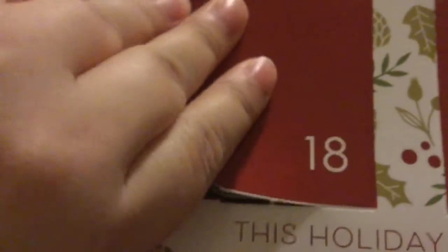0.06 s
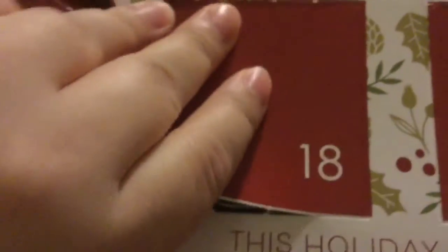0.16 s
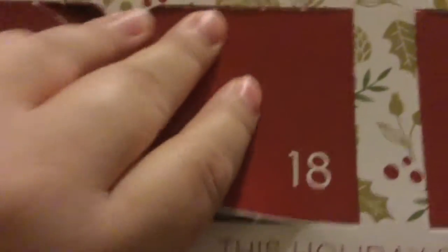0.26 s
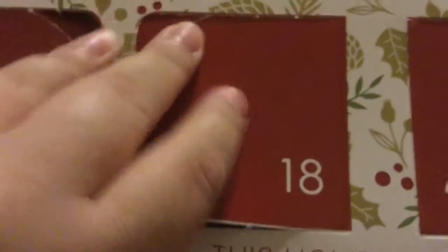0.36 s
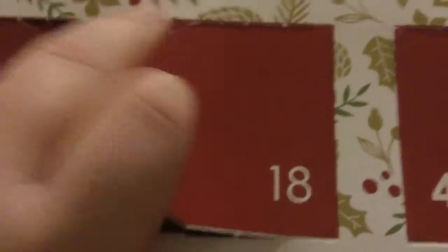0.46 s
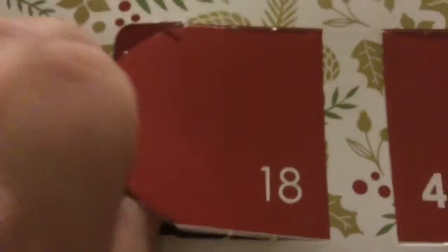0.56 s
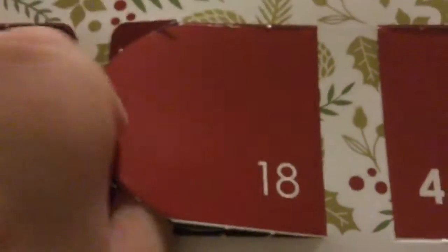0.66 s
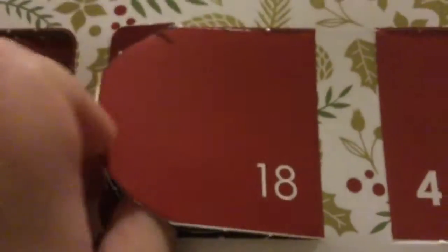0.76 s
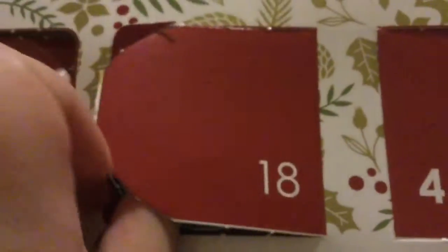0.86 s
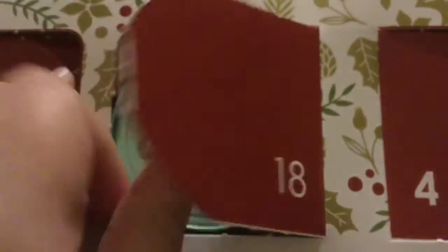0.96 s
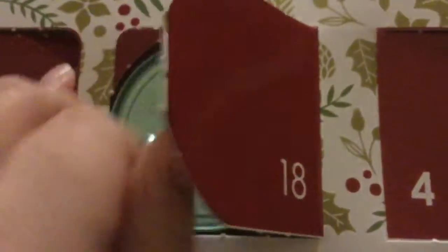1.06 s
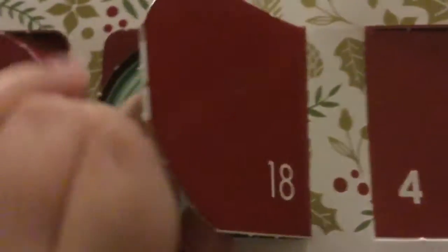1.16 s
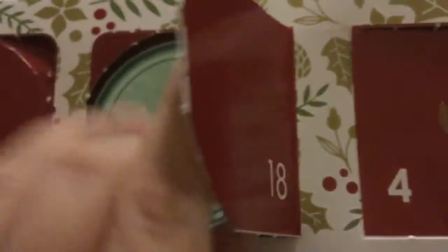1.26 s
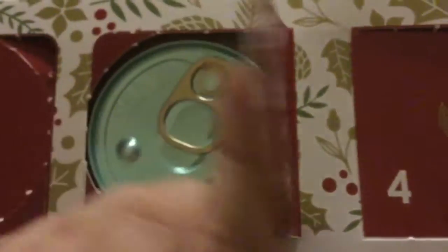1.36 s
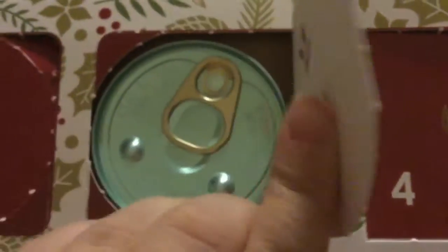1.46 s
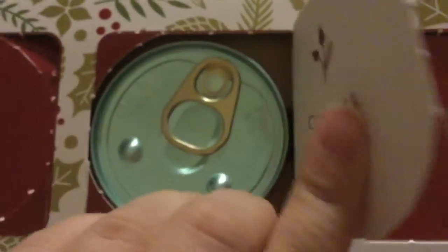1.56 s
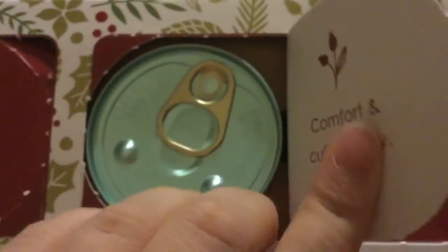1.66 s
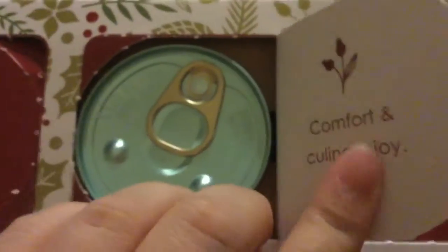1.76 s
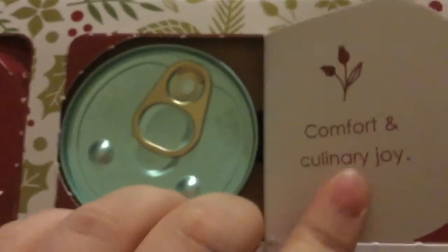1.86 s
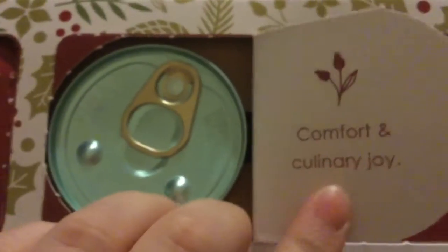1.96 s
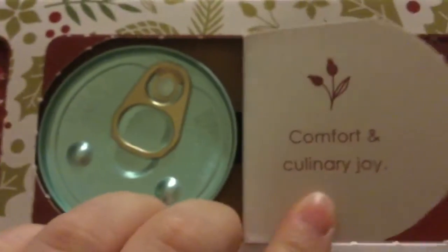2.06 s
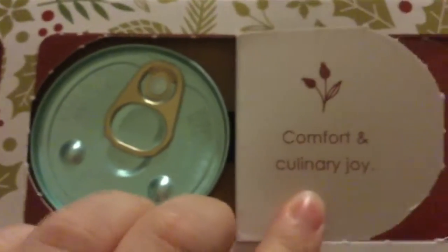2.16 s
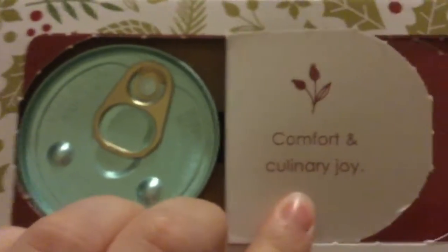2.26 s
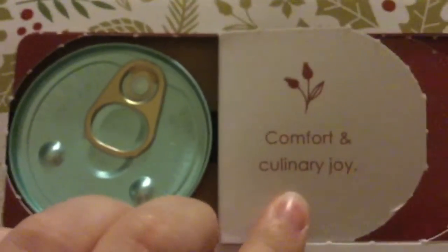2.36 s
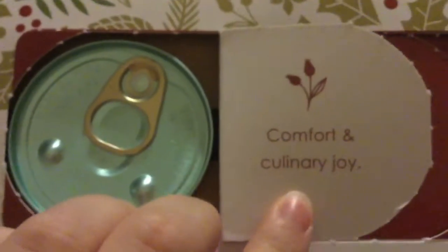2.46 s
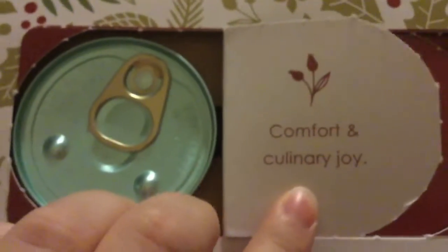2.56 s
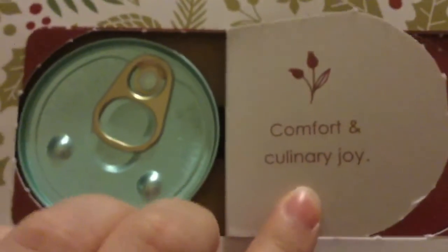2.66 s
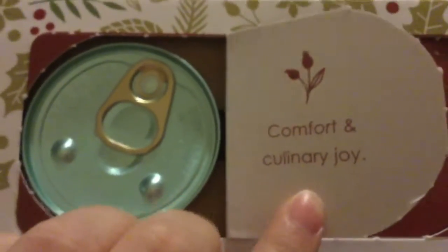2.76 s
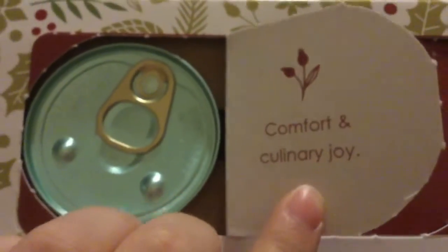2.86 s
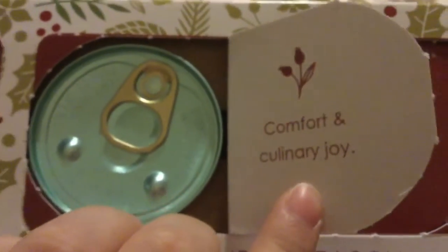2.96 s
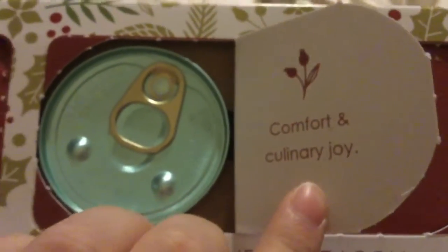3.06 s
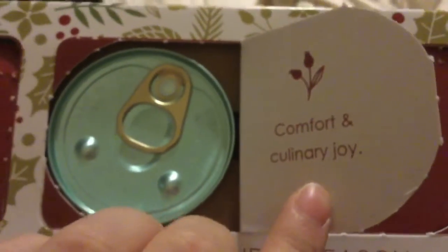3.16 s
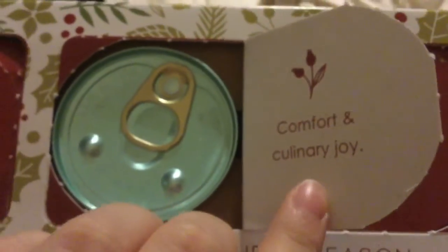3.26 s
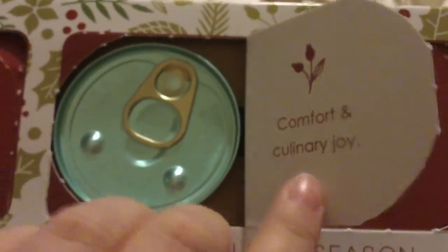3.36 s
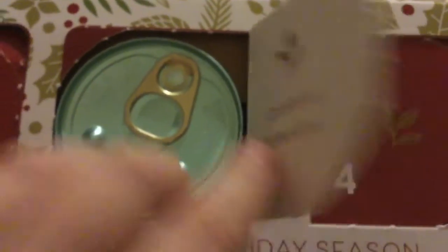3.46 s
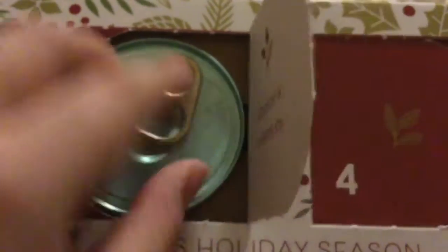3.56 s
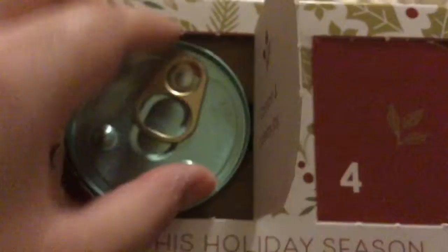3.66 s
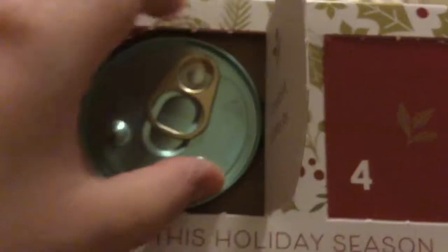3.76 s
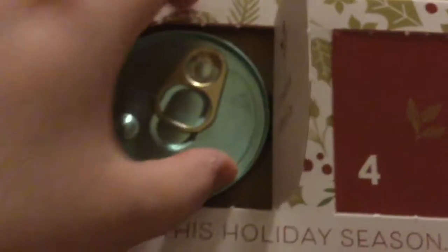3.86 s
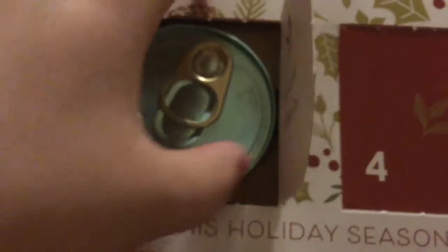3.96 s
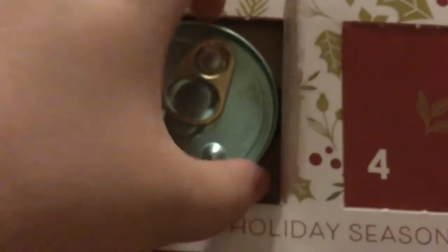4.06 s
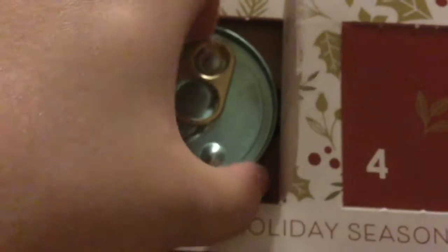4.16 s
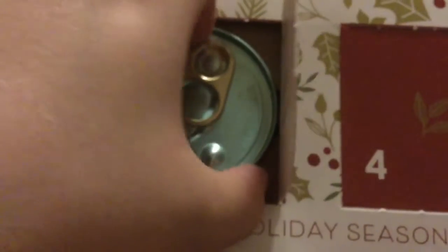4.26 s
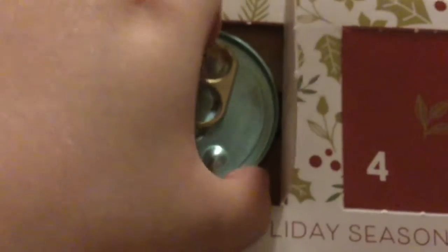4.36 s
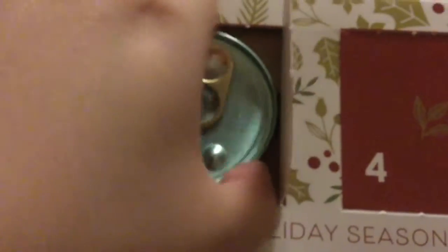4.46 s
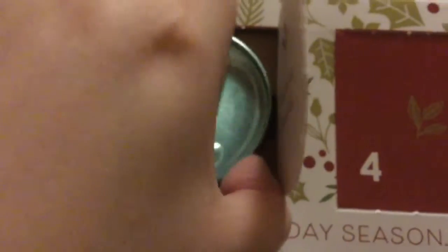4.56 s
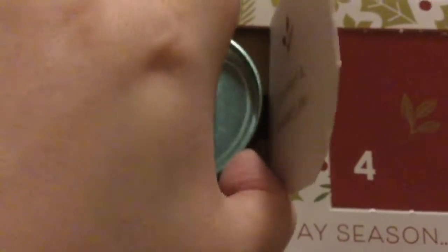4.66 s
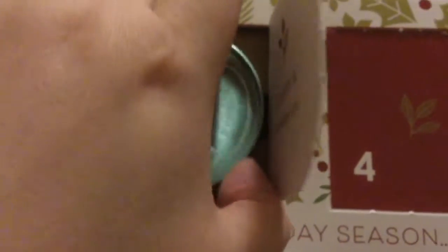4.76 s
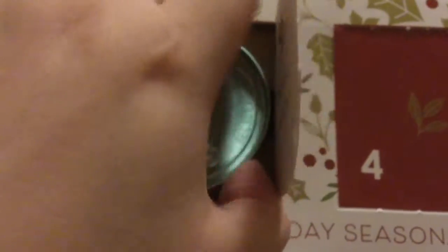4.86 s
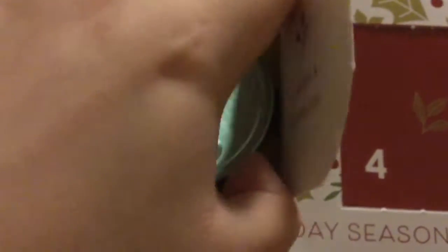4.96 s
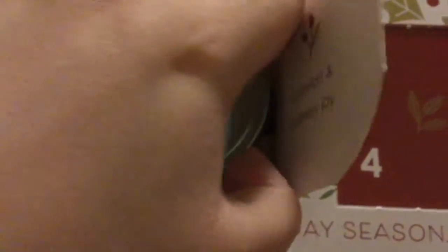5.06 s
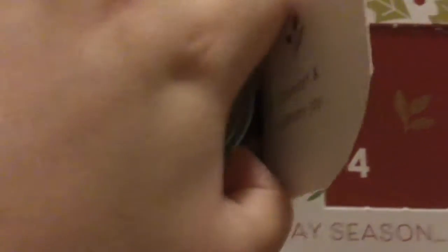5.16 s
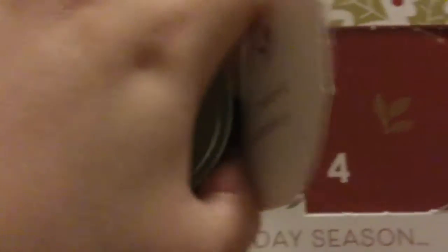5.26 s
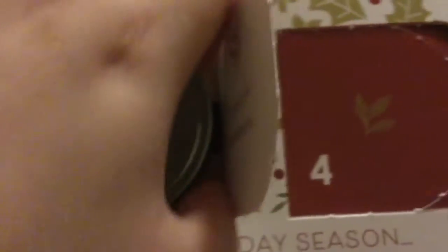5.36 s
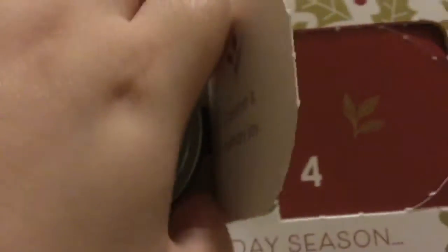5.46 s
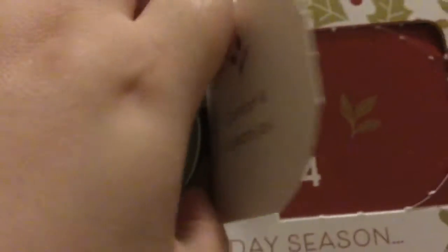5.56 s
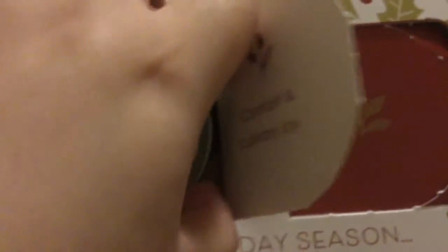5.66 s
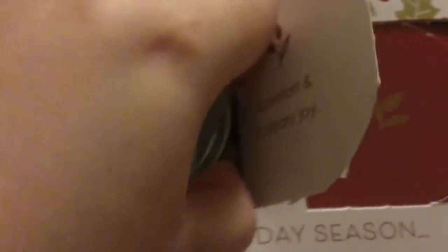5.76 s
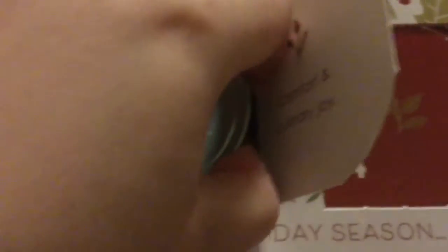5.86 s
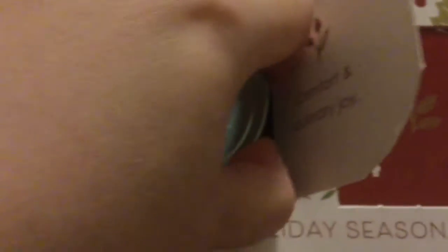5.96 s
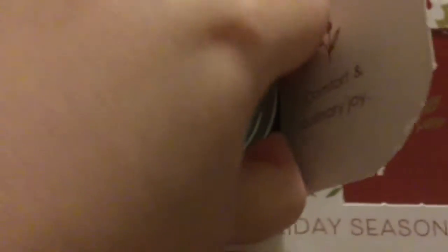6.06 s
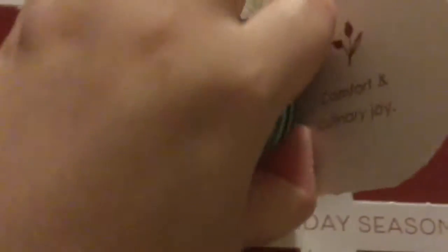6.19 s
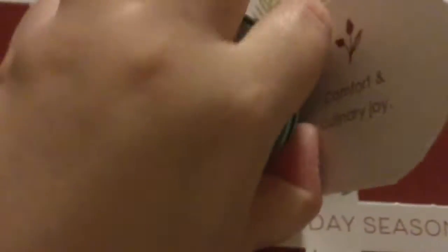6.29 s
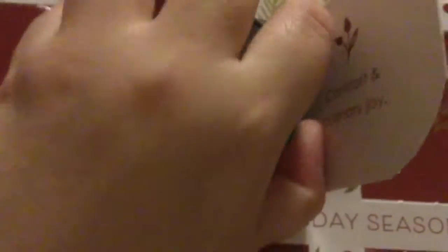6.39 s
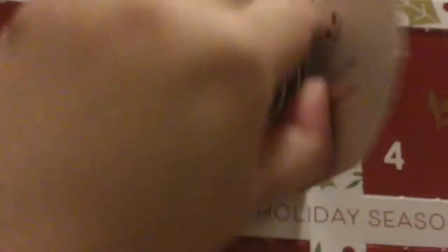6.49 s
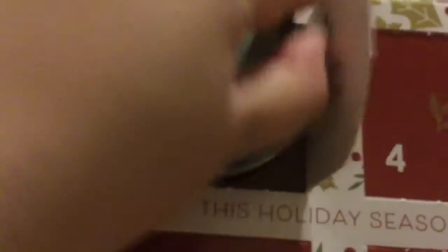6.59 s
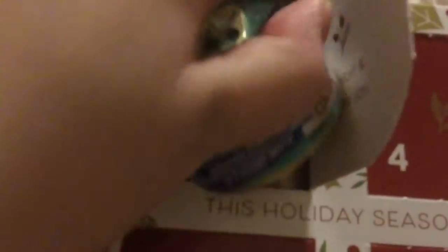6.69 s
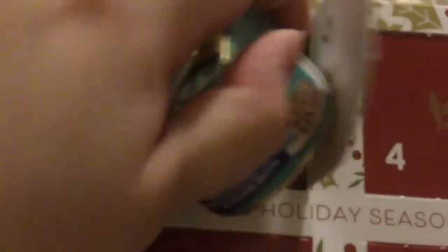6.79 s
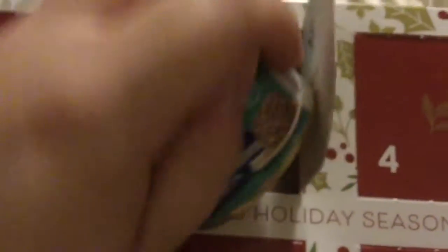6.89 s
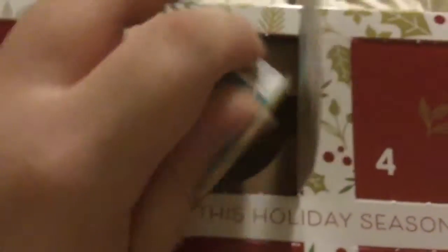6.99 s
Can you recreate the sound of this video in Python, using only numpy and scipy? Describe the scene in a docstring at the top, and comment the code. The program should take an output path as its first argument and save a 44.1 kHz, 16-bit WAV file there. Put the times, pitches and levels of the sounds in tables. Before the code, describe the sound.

Very close in a small dry room, fingers break the paper bridges of a cardboard door: crisp snaps, card flexing and hollow box thuds amid grainy scraping. The folded door settles into near silence with faint taps. Then a hand rubs into the pocket, a tin knocks with a short ring, creaks and scrapes build, a loud pop frees it, and its rim chatters lightly as it slides out. The small microphone sounds thin in the bass.

```python
"""Fingers pop a perforated door out of a cardboard box, fold it back and pry a small tin from its pocket.
First the paper bridges snap, the card flexes and the hollow box thuds: noise bursts, short pings, box ringing.
Between snaps skin and tin scrape on the card: grainy noise coloured by the card. Light taps are short crunches.
Last, the tin knocks in its pocket and chatters as it slides out: ticks and a ringing rim.
A small dry room adds sparse echoes and very faint air; the one microphone is small and easily overloaded."""
import sys
import numpy as np
from scipy import signal
from scipy.fft import rfft, irfft, next_fast_len
from scipy.io import wavfile
from scipy.ndimage import uniform_filter1d

SR = 44100
rng = np.random.default_rng(int(sys.argv[2]) if len(sys.argv) > 2 else 0)


def file_out(sig):
    """Save sig as 16-bit WAV at sys.argv[1]."""
    # one column per channel
    cols = np.atleast_2d(sig).T
    # limit, then scale
    lim = np.clip(cols, -1, 1)
    pcm = np.round(lim * 32767).astype(np.int16)
    wavfile.write(sys.argv[1], SR, pcm)


N = 310023
TIME = np.arange(N) / SR
BLOW_TIME = np.arange(SR // 5) / SR  # the time within one short sound [s]

# ringing of the hollow box: (frequency [Hz], relative level [dB], time to fall by 60 dB [s])
BOX_MODES = [(172, -13, 0.12), (230, -1, 0.08), (287, 2.5, 0.078), (340, 0, 0.048), (397.6, -6, 0.085),
             (637.5, -8, 0.08), (783, -6, 0.036), (980, -11.5, 0.045)]
# the hand bears on the box, tearing, holding the door open, prying: (start [s], length [s], rasp level [dB])
HAND_GRIPS = [(0.027, 1.51, -56), (1.544, 0.12, -61), (3.442, 0.14, -64.5), (3.683, 0.85, -59.5),
              (4.458, 0.44, -54), (4.981, 0.96, -52.5), (6.333, 0.25, -65.5), (6.508, 0.83, -52.5)]
FIRM_DB = -43.5  # a firm touch: a rub this loud judders fully, lighter ones run smoother
EDGE_HZ = 16200  # top of the hiss and of the microphone's range


def amp(db):
    """Turns decibels into gain."""
    return 10 ** (np.asarray(db) / 20)


def unit(x):
    """Scales a sound to rms 1."""
    return x / np.sqrt(np.mean(x ** 2) + 1e-20)


def blow(x, db):
    """Scales a short sound to the energy of 10 ms at the level db."""
    return amp(db) * x / np.sqrt(np.sum(x ** 2) / (SR / 100) + 1e-20)


def read(points, hz):
    """Reads a table of (frequency, value) along log frequency."""
    f, value = np.transpose(points)
    return np.interp(np.log(hz + 1), np.log(f), value)


def add(mix, s, sound):
    """Mixes a sound in at time s."""
    part = mix[max(round(s * SR), 0):][:len(sound)]
    part += sound[:len(part)]


def band(x, lo_hz, hi_hz, order=2):
    """Keeps the sound between two frequencies."""
    edges = [lo_hz, min(hi_hz, 0.49 * SR)]
    return signal.sosfilt(signal.butter(order, edges, "band", fs=SR, output="sos"), x)


def resonate(x, hz, q):
    """Passes a sound through one resonance with gain 1 at its peak."""
    return signal.lfilter(*signal.iirpeak(hz, q, SR), x)


def waver(rate_hz):
    """Makes a smooth random curve of rms 1 that changes up to about rate_hz times a second."""
    smoothing = 1 + (np.fft.rfftfreq(N, 1 / SR) / rate_hz) ** 4
    return unit(irfft(rfft(rng.standard_normal(N)) / smoothing, N))


def snaps(strain_s=0.0028, strain_db=-30, last_db=-17.5):
    """Breaks and buckles of the card: a first strain, the snap itself, then the last fibres."""
    # bridges breaking and card buckling: (time [s], box thud level [dB], card flex level [dB],
    # crack level [dB], flex pitch [Hz], crack pitch [Hz])
    breaks = [(0.1188, -17, -11.5, -17.5, 890, 3950), (0.244, -21, -17.5, -15, 810, 5160),
              (0.55, -17, -15, -18.5, 706, 4020), (0.6256, -21.5, -28.5, -42.5, 1240, 7000),
              (0.6607, -19.5, -20, -19.5, 1700, 2880), (0.6854, -12, -15, -13.5, 1003, 2630),
              (0.7965, -34, -25.5, -21.5, 970, 3700), (1.0066, -22.5, -28, -37.5, 710, 8300),
              (1.0205, -17.5, -10, -14, 643, 2610), (1.0327, -26, -42, -17.5, 2420, 3774),
              (1.4129, -25, -28, -39, 1530, 4800), (1.5118, -28.5, -30, -35, 1754, 3460),
              (2.2012, -37.5, -42.5, -39, 1007, 3494), (3.6806, -28.5, -34.5, -41.5, 669, 4290),
              (3.8837, -36.5, -37, -39.5, 606, 4160), (4.1818, -26, -32, -35, 2350, 4090),
              (4.243, -33.5, -37.5, -33, 1540, 5220), (4.2966, -39, -37, -37, 1570, 3280),
              (4.782, -21, -25, -28, 520, 4100), (5.0338, -33, -37, -39.5, 1720, 3900),
              (5.3358, -32, -34, -30.5, 2160, 2170), (5.689, -26, -19, -22.5, 1636, 4550),
              (5.7951, -33, -27, -31, 629, 3510), (6.245, -13.5, -12, -18, 1510, 4240),
              (6.26, -19.5, -28, -26.5, 747, 2925), (6.8622, -29.5, -32.5, -30, 778, 2615)]
    out = np.zeros(N)
    for s, thud_db, flex_db, crack_db, flex_hz, crack_hz in breaks:
        last_s = rng.uniform(0.003, 0.018)
        for delay, db in [(-strain_s, strain_db), (0, 0), (last_s, last_db)]:
            add(out, s + delay, snap(thud_db + db, flex_db + db, crack_db + db, flex_hz, crack_hz))
    return out


def snap(thud_db, flex_db, crack_db, flex_hz, crack_hz, crack_s=0.0012, flex_s=0.0043, thud_rise_s=0.0025):
    """Fibres break at once, the card around them flaps for a few ms, then the box takes up the blow."""
    t = BLOW_TIME
    fibres, flap = rng.standard_normal((2, len(t)))
    fibres = np.sign(fibres) * (np.exp(-t / crack_s) + 0.052 * np.exp(-t / 0.011))
    ping = np.sin(2 * np.pi * crack_hz * t) * np.exp(-t / 0.0016)  # the freed edge rings for a few cycles
    crack = blow(band(fibres, crack_hz * 0.4, crack_hz * 2.51), 0) + blow(ping, 0)
    crack += blow(np.diff(fibres, prepend=0), -12)  # a bright edge

    flap = flap * (np.exp(-t / flex_s) + 0.15 * np.exp(-t / 0.018))
    bending = np.sin(2 * np.pi * flex_hz * t) * np.exp(-t / 0.0032)
    flex = blow(band(flap, 370, 1750), 0) + blow(bending, 0)

    thud = box_ring(t) * (1 - np.exp(-t / thud_rise_s))
    return blow(crack, crack_db) + blow(flex, flex_db) + blow(thud, thud_db)


def box_ring(t):
    """The box rings in several modes; each blow lands on another spot, so they take different shares."""
    ring = np.zeros(len(t))
    for hz, db, t60 in BOX_MODES:
        fade = amp(db + 2 * rng.standard_normal() - 60 * t / t60)
        sign = rng.choice([-1, 1])
        shifted_hz = hz * (1 + 0.012 * rng.standard_normal())
        ring += fade * sign * np.sin(2 * np.pi * shifted_hz * t)
    return ring


def creaks(rub, per_s=28, thud_db=1, flex_db=-1, crack_db=-3, spread_db=7):
    """While the hand grips, the card keeps giving way in tiny snaps, as loud as the rub allows."""
    out = np.zeros(N)
    for when, a, b, c, flex, crack in rng.random((round(per_s * N / SR), 6)):
        s = when * N / SR
        if any(start < s < start + length for start, length, _ in HAND_GRIPS):
            levels = np.array([thud_db, flex_db, crack_db]) + spread_db * (2 * np.array([a, b, c]) - 1)
            tiny_snap = snap(*levels, 600 * 2.7 ** flex, 2400 * 2 ** crack)
            add(out, s, rub[int(when * N)] * tiny_snap)
    return out


def bend(x, lag_s=0.001196):
    """Low bending waves in card are slower: a snap sweeps downward, lag_s late at 1 kHz, on time from 4 kHz."""
    size = next_fast_len(N + SR // 4)
    khz = np.fft.rfftfreq(size, 1 / SR) / 1000
    turns = 1000 * lag_s * (4 * np.sqrt(khz) - khz)  # phase lag in whole cycles
    turns = np.where(khz < 4, turns, turns.max())
    return irfft(rfft(x, size) * np.exp(-2j * np.pi * turns), size)[:N]


def rubbing(grip_rumble_db=0, grip_hiss_db=-12.5):
    """Gains of rasp, rumble and hiss over time: all slides and the dull grips add in power."""
    # slides of a finger, the door or the tin along the card: picking at the bridges, tearing the door free,
    # folding it back, reaching into the pocket, working the tin loose, sliding it out. Soft pressure rumbles,
    # a torn edge hisses: (start [s], length [s], rasp level [dB],
    # rumble level relative to rasp [dB], hiss level relative to rasp [dB])
    slides = [(0.344, 0.068, -44, -25, -2), (0.444, 0.05, -36, 0.5, -9.5), (0.52, 0.32, -47.5, 1, -2.5),
              (0.986, 0.17, -43.5, -28, -2.5), (1.192, 0.048, -39.5, 4.5, 0.5), (1.244, 0.27, -46, -17, 1),
              (1.637, 0.45, -54, -1, -2.5), (2.105, 0.19, -56, 3, -20.5), (3.509, 0.051, -41.5, -23, -4),
              (3.677, 0.038, -40.5, 8.5, -3.5), (3.752, 0.025, -40, -7, -6), (4.087, 0.17, -45, 0, -7),
              (4.473, 0.27, -46.5, -9, -10), (4.732, 0.16, -41.5, 0, -3.5), (5.085, 0.05, -46, -25, 2),
              (5.268, 0.1, -44, 2.5, -2), (5.403, 0.15, -44.5, -13, -5), (5.563, 0.16, -43, -22, -13.5),
              (5.782, 0.12, -45.5, -27, -0.5), (6.015, 0.31, -49, -2.5, -11.5),
              (6.177, 0.1, -40, -24, -4.5), (6.533, 0.064, -37.5, -6.5, -6), (6.601, 0.074, -41, -18, -1.5),
              (6.66, 0.032, -32.5, 5, 0.5), (6.725, 0.068, -46, -10, -7)]
    grips = [(*grip, grip_rumble_db, grip_hiss_db) for grip in HAND_GRIPS]
    power = np.zeros((3, N))
    for start, length, db, rumble_db, hiss_db in list(slides) + grips:
        gains = amp([[db], [db + rumble_db], [db + hiss_db]])
        power += gains ** 2 * pressure(start, length) ** 2
    return np.sqrt(power)


def pressure(start, length, attack_s=0.018, sag_db=3.5, release_db_per_s=546):
    """A slide or grip bites, eases as it runs, then dies away."""
    t = TIME - start
    fall_db = sag_db * np.clip(t / length, 0, 1) + release_db_per_s * np.clip(t - length, 0, 1)
    return np.clip(t / attack_s, 0, 1) * amp(-fall_db)


def scrape(rub, soft, sharp, hollow=2):
    """Rubbing rasps in the card, rumbles in the modes of the box and hisses at the torn edges."""
    drive = friction(np.minimum(rub / amp(FIRM_DB), 1))
    hollow_sound = sum(amp(db) * resonate(drive, hz, hz * t60 / 2) for hz, db, t60 in BOX_MODES)
    boxed = drive + hollow * hollow_sound
    rasp = unit(band(drive, 350, 5200, order=4))
    rumble = unit(band(boxed, 110, 540, order=4))
    hiss = unit(band(drive, 5510, EDGE_HZ, order=4))
    return rub * rasp + soft * rumble + sharp * hiss


def friction(firm, grains_per_s=1400, spread_db=4, smooth=1.3, judder_db=3.0, patchy_db=5.5):
    """Fibres catch and let go in clumps; the card's resonances shift as the contact point moves."""
    # colour of rubbed card: (frequency [Hz], level [dB])
    card_colour = [(80, -28), (200, -7.5), (285, -7.5), (480, -21), (680, -8.5), (1150, -13.5), (1550, -9),
                   (2050, -14), (3300, -11.5), (6500, -18), (12000, -17.5), (16000, -27)]
    sizes = amp(spread_db * np.minimum(rng.exponential(1, N), 5))
    signs = rng.choice([-1, 1], N)
    grains = sizes * signs * (rng.random(N) < grains_per_s / SR)
    judder = amp(judder_db * firm * waver(42))
    drive = (unit(grains) + smooth * rng.standard_normal(N)) * judder

    hz, t, z = signal.stft(drive, SR, nperseg=512, noverlap=384)
    # smooth random patches over frequency and time
    patches = uniform_filter1d(rng.standard_normal(z.shape), size=6, axis=0)
    patches = unit(uniform_filter1d(patches, size=11, axis=1))
    depth = patchy_db * np.interp(t, TIME, firm) / np.hypot(1, hz[:, None] / 6000)  # fine hiss is more even
    z = z * amp(read(card_colour, hz)[:, None] + depth * patches)
    return signal.istft(z, nperseg=512, noverlap=384)[1][:N]


def jolts(jolt_hz=170, decay_s=0.015):
    """The whole box gives a deep, quickly damped bump."""
    # the box jolts as the door, and later the tin, comes free: (time [s], level [dB])
    bumps = [(1.022, -27.5), (6.255, -23)]
    out, t = np.zeros(N), BLOW_TIME
    for s, db in bumps:
        add(out, s, blow(np.sin(2 * np.pi * jolt_hz * t) * np.exp(-t / decay_s), db))
    return out


def taps(tap_s=0.0022, slow_db=14, rustle_db=-21.5, rustle_s=0.018,
         box_db=2, bright_hz=1730, bright_db_per_octave=-7.5):
    """A short crunch with a grainy rustle after it; above bright_hz, a brighter one thuds less in the box."""
    # light taps, small card snaps and the dull body of the tin's knock: (time [s], level [dB], pitch [Hz])
    light_blows = [(0.2862, -34.5, 2700), (1.178, -35.5, 710), (2.272, -49.5, 1600), (2.328, -55.5, 1750),
                   (2.496, -51, 3620), (2.524, -45.5, 2970), (2.579, -48.5, 3630), (2.591, -42, 3380),
                   (2.697, -57.5, 2370), (2.725, -60.5, 1000), (4.482, -28.5, 790), (4.715, -39.5, 1700),
                   (4.746, -37.5, 1590), (4.765, -46, 4100), (6.229, -32, 990), (6.85, -37, 1300)]
    out, t = np.zeros(N), BLOW_TIME
    for s, db, hz in light_blows:
        # lighter blows last longer
        u = t / (tap_s * 2 ** ((FIRM_DB - db) / slow_db) + tap_s / 2)
        grains = unit(rng.standard_normal(len(t)) ** 3)
        rustle = amp(rustle_db) * np.tanh(u) * np.exp(-t / rustle_s)  # the card settles
        burst = grains * (u * np.exp(-u) + rustle)
        crunch = band(burst + resonate(burst, hz, 12), hz / 4, hz * 1.54, order=4)
        thud_db = box_db + bright_db_per_octave * max(np.log2(hz / bright_hz), 0)  # relative to the crunch
        thud = box_ring(t) * np.tanh(u / 2)
        add(out, s, blow(crunch, db) + blow(thud, db + thud_db))
    return out


def strokes(wash_db=-12, q=4.9, body_db=-9):
    """Each swipe swells and fades, sings in one broad resonance of the card and murmurs in the box."""
    # single swipes of a fingertip or the tin across the card:
    # (time [s], length [s], level [dB], pitch [Hz])
    swipes = [(0.373, 0.28, -40, 2980), (1.82, 0.37, -49.5, 2440), (2.816, 0.043, -53.5, 2510),
              (2.91, 0.043, -60, 2280), (2.978, 0.15, -70, 566), (3.353, 0.042, -56, 2350),
              (3.49, 0.11, -39.5, 2200), (5.675, 0.032, -34, 4430), (6.753, 0.1, -46, 2420)]
    out, drive = np.zeros(N), friction(np.full(N, 0.5))
    for s, length, db, hz in swipes:
        touch = drive[round(s * SR):][:round(length * SR)]
        swell = np.sin(np.linspace(0, np.pi, len(touch)))
        brush = unit(resonate(resonate(touch, hz, q), hz, 0.27))
        body = amp(body_db) * unit(band(touch, 140, 1100))
        # a wide rush of noise around the swipe's pitch
        wash = amp(wash_db) * unit(band(touch, hz / 3, hz * 3, order=4))
        add(out, s, amp(db) * swell * (brush + body + wash))
    return out


def chatter(wobble=0.025):
    """Each knock or slip ticks and rings the rim; its pitch depends on how the pocket pinches it, and wobbles."""
    # the rim knocking in its pocket, then sticking and slipping on the way out:
    # (time [s], level [dB], pitch [Hz])
    slips = [(4.462, -30, 1390), (4.481, -19, 1497), (4.4855, -22, 1520), (6.7208, -31, 1230),
             (6.74, -31, 1330), (6.753, -30, 1370), (6.7645, -34, 1381), (6.775, -32, 1374)]
    # ringing of the rim: (multiple of the pitch [ratio], relative level [dB], time to fall by 60 dB [s])
    rim_modes = [(1, 2, 0.044), (1.68, -7, 0.025), (2.27, 4, 0.016), (3.15, -7, 0.0057)]
    out, t = np.zeros(N), BLOW_TIME
    for s, db, hz in slips:
        turns = hz * np.cumsum(1 + wobble * waver(99)[:len(t)]) / SR
        ring = sum(amp(mode_db - 60 * t / t60) * np.sin(2 * np.pi * k * turns)
                   for k, mode_db, t60 in rim_modes)
        tick = band(rng.standard_normal(len(t)) * np.exp(-t / 0.00086), 1700, 4560, order=3)
        add(out, s, blow(ring, db) + blow(tick, db - 9.5))
    return out


def room(x):
    """The room sends back sparse reflections, each band dying at its own speed."""
    # ring of the room: (frequency [Hz], time to fall by 60 dB [s])
    room_decay = [(150, 0.25), (14000, 0.23)]
    echoes = rng.choice([-1., 1.], SR // 2) * (rng.random(SR // 2) < 3000 / SR)
    echoes[:round(0.006 * SR)] = 0  # the first echo takes at least 6 ms
    hz, t, z = signal.stft(echoes, SR, nperseg=256)
    fade = amp(-60 * t / read(room_decay, hz)[:, None])
    tail = signal.istft(z * fade, SR, nperseg=256)[1]
    return signal.fftconvolve(x, tail / np.linalg.norm(tail))[:N]


def stillness(db=-92):
    """Barely audible room air: a steady band of soft noise."""
    return amp(db) * unit(band(rng.standard_normal(N), 120, 700))


def scene(room_db=-18):
    """Adds all sounds of the box and tin, their echoes in the room and the room air."""
    rub, soft, sharp = rubbing()
    box = bend(snaps() + creaks(rub))
    box = box + scrape(rub, soft, sharp) + jolts() + taps() + strokes() + chatter()
    return (box + amp(room_db) * room(box) + stillness())[None]


def record(dry, order=3, ceiling=0.9, low_cut_hz=95):
    """The small microphone loses deep bass, rounds off peaks near its ceiling and cuts the highest treble."""
    thin = signal.sosfilt(signal.butter(order, low_cut_hz, "high", fs=SR, output="sos"), dry)
    held = thin / (1 + (thin / ceiling) ** 10) ** (1 / 10)
    treble_cut = signal.firwin(255, EDGE_HZ, window=("kaiser", 9), fs=SR)
    return signal.oaconvolve(held, treble_cut[None], "same")


dry = scene()
out = record(dry)
file_out(out)
```